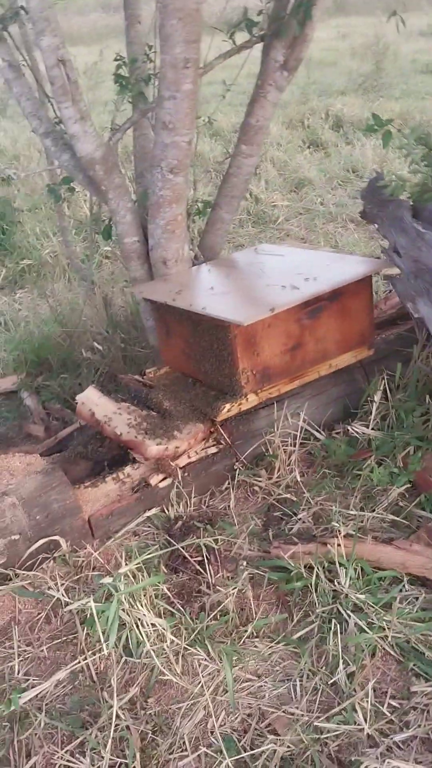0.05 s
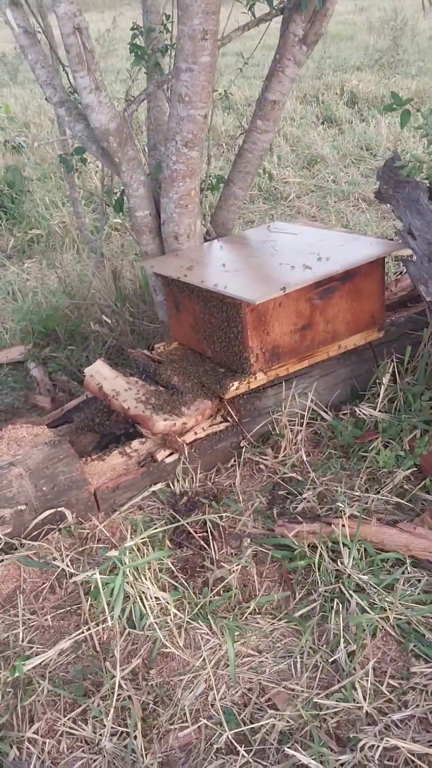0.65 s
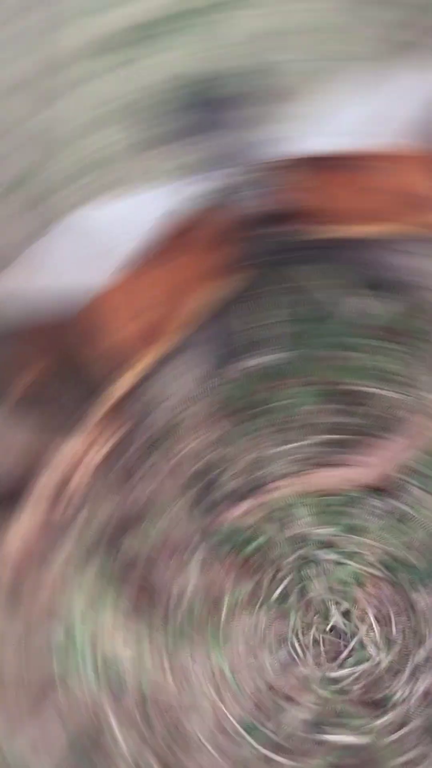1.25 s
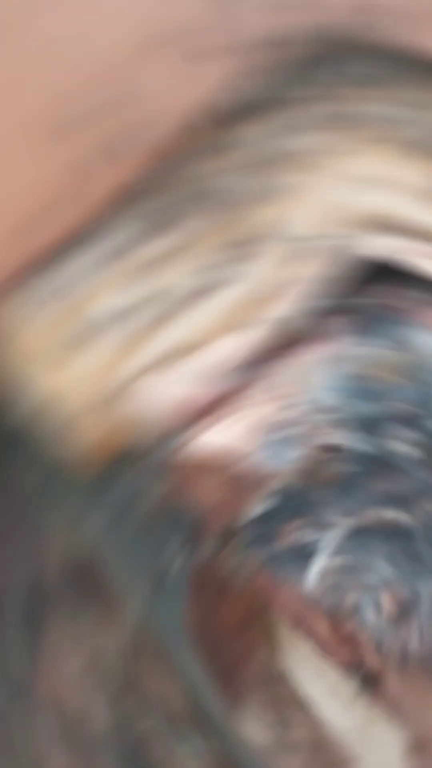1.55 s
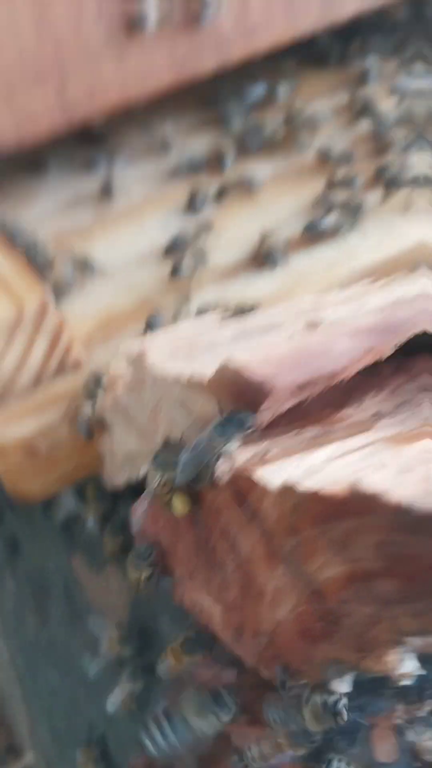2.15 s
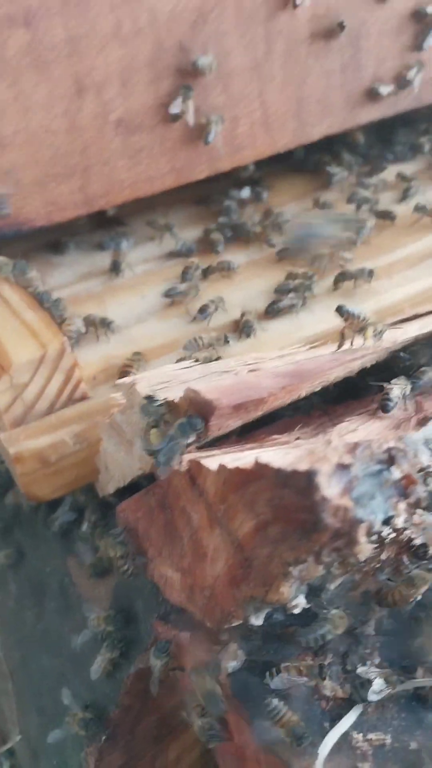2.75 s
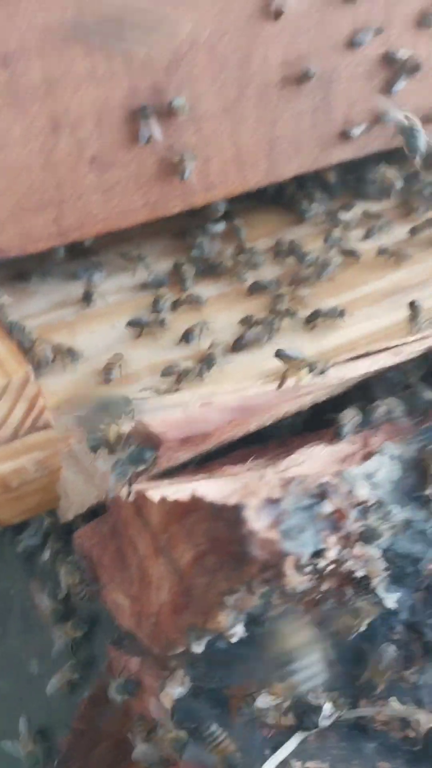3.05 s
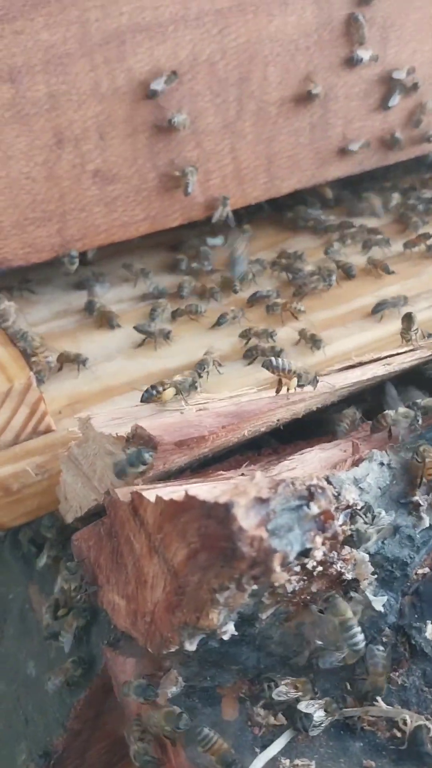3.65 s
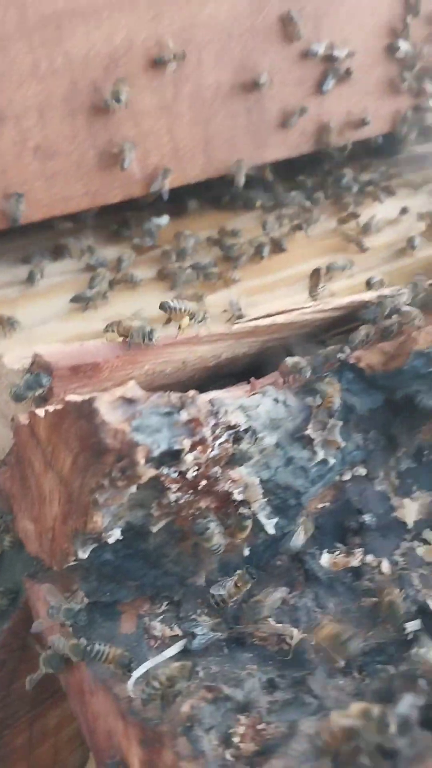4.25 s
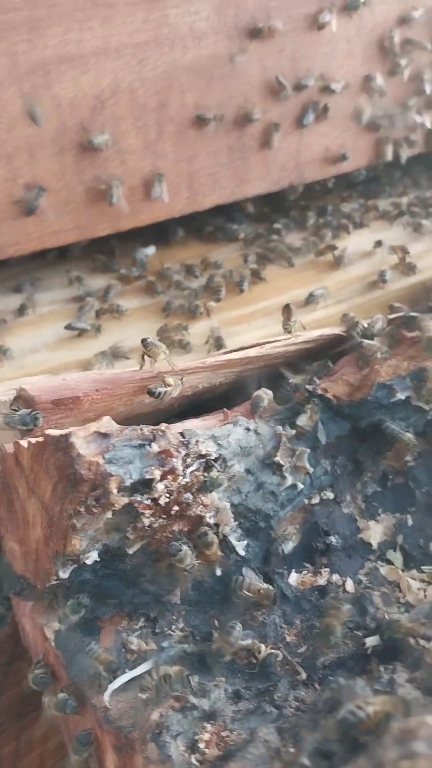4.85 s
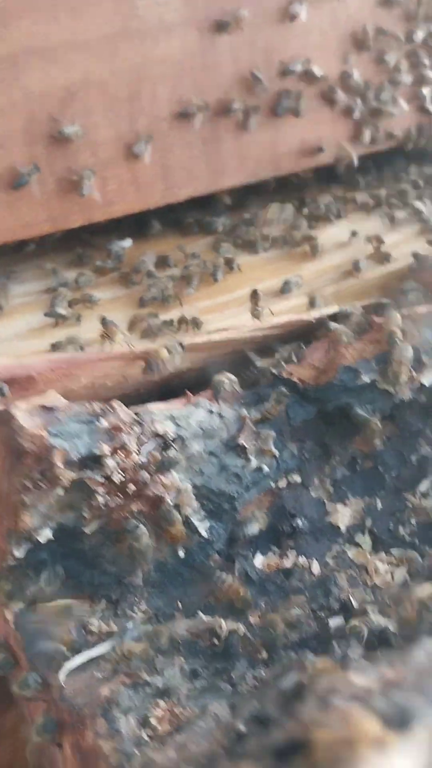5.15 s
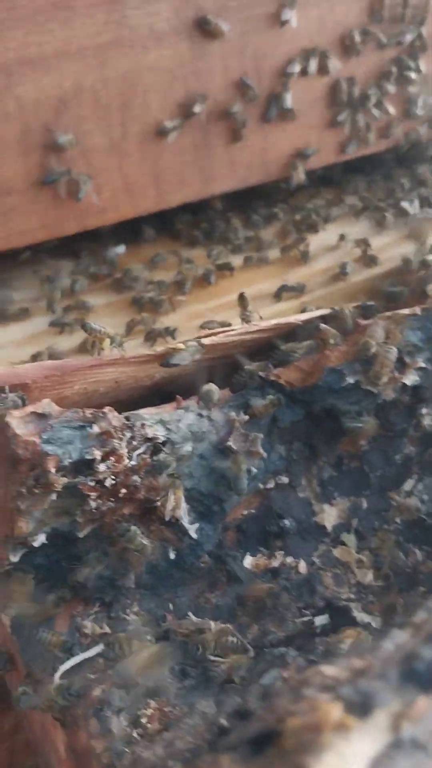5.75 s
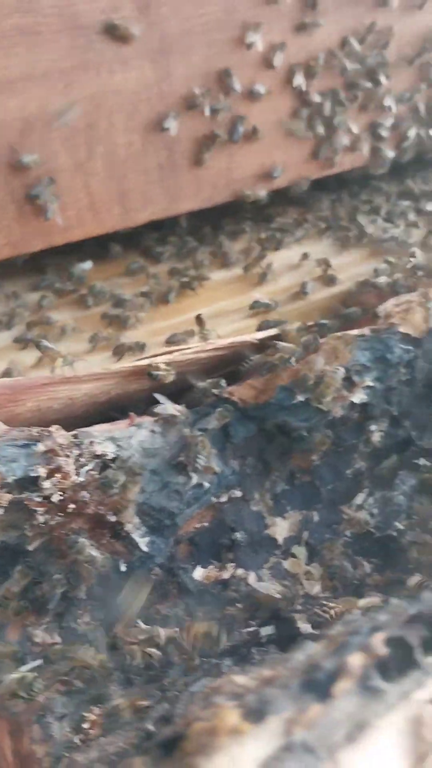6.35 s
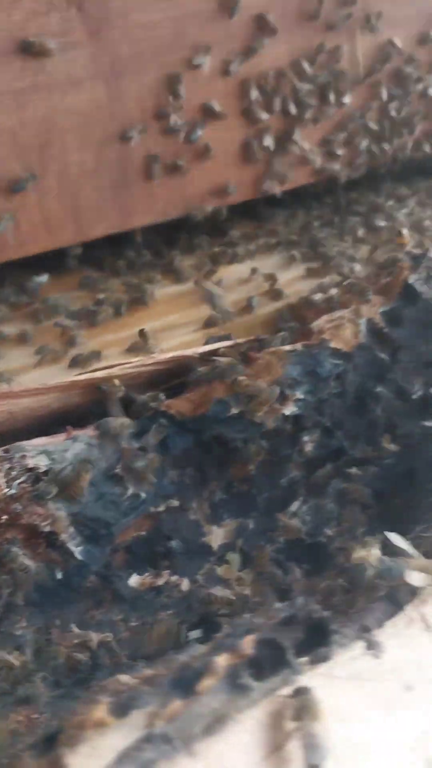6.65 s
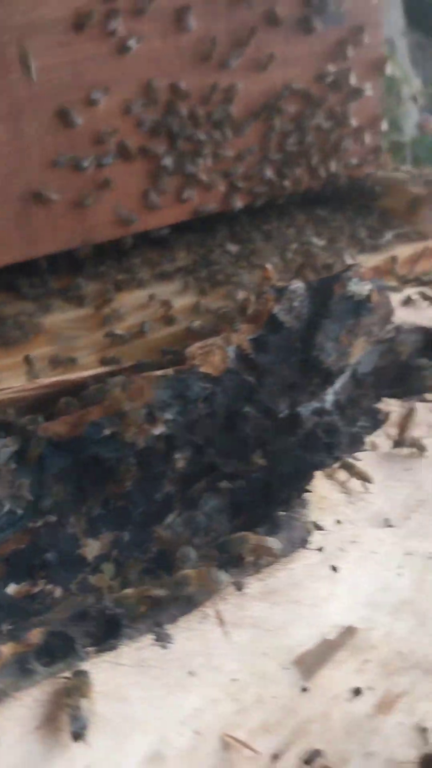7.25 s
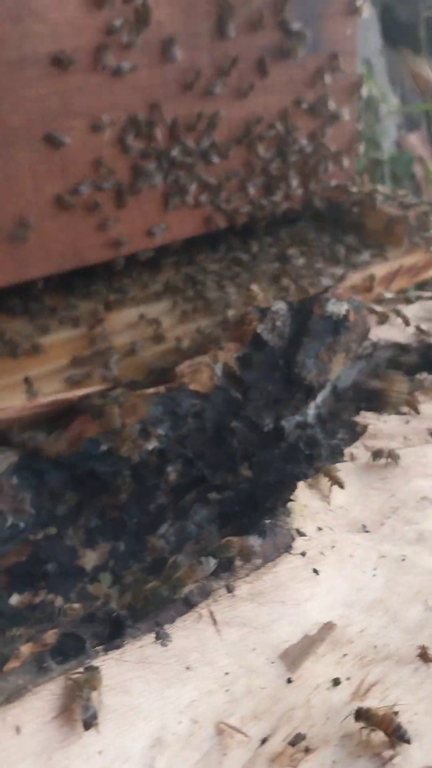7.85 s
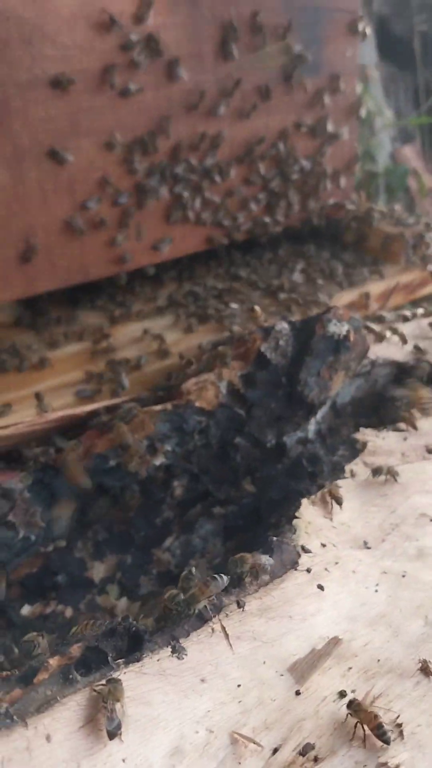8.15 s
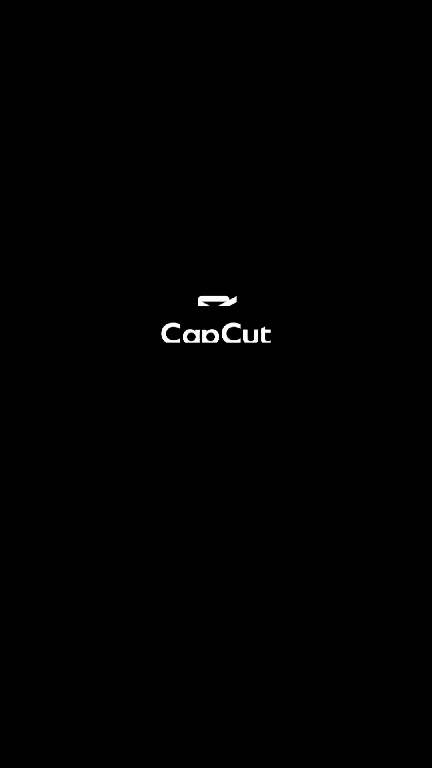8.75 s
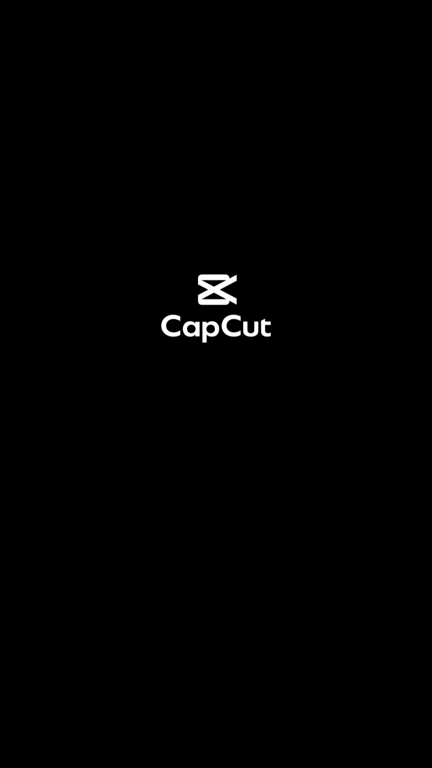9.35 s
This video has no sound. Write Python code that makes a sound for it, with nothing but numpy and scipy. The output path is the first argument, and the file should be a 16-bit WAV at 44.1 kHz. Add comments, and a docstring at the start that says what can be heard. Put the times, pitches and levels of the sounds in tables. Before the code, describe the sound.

For the first 1.5 seconds a honeybee swarm hums faintly from a few metres away outdoors, with a thin insect shrill in the grass. After a split-second gap, the swarm is close and louder at the wooden hive's entrance: a dense, rasping buzz with a fine crawling rustle and dull puffs of air on the microphone. Single bees pass on the left at about 2.7, 4.1 and 4.6 seconds, and on the right at 6.3 and 6.9. Some bump the microphone with soft, low thumps, mostly left, strongest at 4.6 and 6 seconds. Tiny bright ticks come at 2.2 and 6.7. From 4.5 seconds one bee hovers at the left, its drone loudest between 7 and 7.8, while the insect shrill fades. At 7.8 the level drops and the left side loses its bass. Everything cuts off at about 8.5 seconds.

```python
"""A field with a wooden hive box: a honeybee swarm settles, heard from a few metres, then at the entrance.
Dozens of wingbeats merge into a rasping hum. Single bees fly past, one hovers at the left microphone,
some bump it softly or tick against something hard. Insects shrill in the grass, air puffs on the
microphones and the crawling cluster rustles. Near the end the level drops and the left loses its bass."""
import sys
import numpy as np
from scipy import signal
from scipy.fft import rfft, irfft, next_fast_len
from scipy.io import wavfile

SR = 44100
rng = np.random.default_rng(int(sys.argv[2]) if len(sys.argv) > 2 else 0)


def persist_wave(psi):
    """Save psi, clipped to +-1, as 16-bit WAV."""
    counts = np.round(np.clip(psi, -1, 1) * 32767).astype(np.int16)
    wavfile.write(sys.argv[1], SR, np.atleast_2d(counts).T)


N = 414965
TIME = np.arange(N) / SR
FAR_SPAN_S, NEAR_SPAN_S = (-.01, 1.474), (1.528, 8.474)
IS_FAR = TIME < FAR_SPAN_S[1]


def from_db(db):
    return 10 ** (np.asarray(db) / 20)


def unit_rms(x):
    return x / np.sqrt(np.mean(x ** 2) + 1e-20)


def curves(rows):
    """Columns after time_s, interpolated to every sample."""
    time_s, *columns = np.transpose(rows)
    return [np.interp(TIME, time_s, column) for column in columns]


def gate(start_s, end_s, edge_s=.002):
    return np.clip(np.minimum(TIME - start_s, end_s - TIME) / edge_s, 0, 1)


def pan(pan_db):
    """Stereo gains; pan_db is left minus right, the louder side stays at unity."""
    return from_db(np.minimum(0, np.array([[1], [-1]]) * pan_db))


def drift(rate_hz, hop=100):
    """Smooth random wander, unit RMS."""
    pole = np.exp(-2 * np.pi * rate_hz * hop / SR)
    white = rng.standard_normal(N // hop + 1002)
    slow = signal.lfilter([1], [1, -2 * pole, pole * pole], white)[1000:]
    return np.interp(TIME, np.arange(len(slow)) * hop / SR, unit_rms(slow))


def coloured_noise(spectrum):
    """Uncorrelated stereo noise, unit RMS."""
    freq_hz, density_db = np.transpose(spectrum)
    size = next_fast_len(N, True)
    log_hz = np.log(np.fft.rfftfreq(size, 1 / SR) + 1)
    gain = from_db(np.interp(log_hz, np.log(freq_hz), density_db))
    white = rng.standard_normal((2, size))
    return unit_rms(irfft(gain * rfft(white))[:, :N])


def swell_power(rows, falloff):
    """Stereo power of events that rise and fall like a fly-by."""
    return sum((from_db(level_db) * pan(pan_db)) ** 2 / (1 + ((TIME - peak_s) / width_s) ** 2) ** falloff
               for peak_s, width_s, level_db, pan_db in rows)


def wing_cycle(harmonics_db, first=1, size=4096, tail_step_db=1.94):
    """One cycle of wing pressure: random phases, ten fading harmonics past the last given."""
    levels_db = np.r_[harmonics_db, harmonics_db[-1] - tail_step_db * np.arange(1, 11)]
    orders = np.arange(len(levels_db))[:, None] + first
    angle = 2 * np.pi * (orders * np.arange(size) / size + rng.random(orders.shape))
    return np.sqrt(2) * from_db(levels_db) @ np.sin(angle)


def repeat_cycle(cycle, beats):
    return cycle[(beats * len(cycle)).astype(int) % len(cycle)]


# insect shrill: freq_hz, density_db
SHRILL_SPECTRUM = [(3000, -18.5), (3500, -28.5), (3850, -7), (4300, -9), (5000, -6.5), (5450, 0.5),
                   (5800, -0.5), (6050, -5), (6300, -22), (7000, -47.5)]

def grass_insects():
    """A wavering high band of noise that dies away late."""
    level_db = np.interp(TIME, [1.5, 5.5, 7.8], [-55, -53, -67])
    return from_db(level_db + drift(9.6)) * coloured_noise(SHRILL_SPECTRUM)


# moving air, puff rumble: freq_hz, density_db
AIR_SPECTRUM = [(20, -22), (40, -16.5), (65, -1.5), (105, -5.5), (160, 8.5), (300, -3), (1000, -41)]
PUFF_SPECTRUM = [(20, -15), (40, -10), (65, -1), (110, 0.5), (170, -5), (300, -18), (1000, -49)]
# air puffs: peak_s, half_width_s, level_db, pan_db
AIR_PUFFS = [(1.93, 0.09, -42, -17), (2.27, 0.052, -49, 7.5), (3.55, 0.047, -52.5, 1),
             (4.15, 0.044, -39.5, 22.5), (4.58, 0.04, -38, 22), (5.78, .11, -46.5, 14),
             (6.28, 0.038, -36.5, -20), (6.62, 0.035, -41, -5.5), (7.04, .045, -33.5, -13.5),
             (7.22, .05, -29.5, 37), (7.42, 0.043, -33, 32)]

def moving_air(far_db=-67, near_db=-57.5, gust_db=5.1):
    """Air on the microphones: an uneven low wash and dull puffs."""
    level_db = np.where(IS_FAR, far_db, near_db) + gust_db * drift(13)
    wash = from_db(level_db) * coloured_noise(AIR_SPECTRUM)
    puffs = np.sqrt(swell_power(AIR_PUFFS, falloff=1.9)) * coloured_noise(PUFF_SPECTRUM)
    return wash + puffs


# cluster rustle: freq_hz, density_db
RUSTLE_SPECTRUM = [(2000, -13), (5000, -6), (7000, -4.5), (8600, -10.5), (10500, -5.5), (12800, -1),
                   (16000, -2)]
# steady crawling: time_s, level_db, pan_db
CRAWL_LEVELS = [(1.53, -47, 5.5), (4.5, -47, 11), (5.2, -48.5, 7), (6.7, -47.5, 8), (7.4, -49.5, 4.5),
                (8.47, -50, 12)]
# rustle flurries: peak_s, half_width_s, level_db, pan_db
CRAWL_FLURRIES = [(1.54, 0.036, -34, -6), (2.22, 0.1, -39, 4), (6.22, .08, -37.5, 11),
                  (6.75, 0.056, -38, 11.5), (6.88, 0.073, -35, 9.5), (7.05, 0.047, -39, 3),
                  (7.62, 0.036, -43, 14)]

def crawling_cluster(far_db=-60.5, far_pan_db=2, scratch_db=1.3):
    """Feet and wings scratch unevenly on wood and bark, with brief flurries."""
    level_db, pan_db = curves(CRAWL_LEVELS)
    sides = pan(np.where(IS_FAR, far_pan_db, pan_db))
    sides = 2 * sides / np.hypot(*sides)   # constant power, +3 dB
    steady = from_db(np.where(IS_FAR, far_db, level_db)) * sides
    flurry_power = ~IS_FAR * swell_power(CRAWL_FLURRIES, falloff=2.2)
    scratch = unit_rms(from_db(scratch_db * drift(163)))
    return np.sqrt(steady ** 2 + flurry_power) * scratch * coloured_noise(RUSTLE_SPECTRUM)


# hard contacts: start_s, peak_db, centre_hz, pan_db
BEE_TICKS = [(2.183, -21, 12930, 17), (6.736, -21, 14000, 11)]

def bee_ticks(decay_s=.0018, size=1024):
    """Bees strike something hard: milliseconds of bright crackle."""
    out, age_s = np.zeros((2, N)), np.arange(size) / SR
    for start_s, peak_db, centre_hz, pan_db in BEE_TICKS:
        burst = rng.standard_normal(size) * np.exp(-age_s / decay_s)
        tick = signal.lfilter(*signal.iirpeak(centre_hz, Q=4, fs=SR), burst)
        start = int(start_s * SR)
        out[:, start:start + size] += from_db(peak_db) * pan(pan_db) * tick / np.abs(tick).max()
    return out


# soft contacts: time_s, peak_db, pitch_hz, pan_db
BEE_BUMPS = [(1.317, -36, 90, -28), (1.344, -39, 90, -23), (2.728, -19.5, 95, 30), (2.787, -20.5, 105, 30),
             (4.136, -20.5, 124, 34), (4.148, -18, 108, 30), (4.584, -3, 153, 38), (4.601, -19, 100, 29),
             (4.618, -23, 100, 24), (5.951, -10, 162, 32), (5.969, -19.5, 109.5, 33),
             (6.237, -27, 100, -28.5), (6.272, -39, 110, -23.5), (6.298, -22, 109, -26),
             (7.222, -20, 120, 32.5), (7.417, -23.5, 115, 30), (8.38, -38, 79.96, -25)]

def bee_bumps(rise_cycles=.51, size=4096):
    """Bees brush the microphones: a soft push of air, gone in about two cycles."""
    out, age_s = np.zeros((2, N)), np.arange(size) / SR
    for time_s, peak_db, pitch_hz, pan_db in BEE_BUMPS:
        rise = age_s * pitch_hz / rise_cycles
        push = rise ** 2 * np.exp(-2 * rise) * np.sin(2 * np.pi * pitch_hz * age_s)
        start = int((time_s - .25 / pitch_hz) * SR)
        out[:, start:start + size] += from_db(peak_db) * pan(pan_db) * push / np.abs(push).max()
    return out


# entrance peaks and dip: centre_hz, q, gain_db
ENTRANCE_BANDS = [(333, 10, -2), (434, 4.2, 4), (684, 18, 5.5)]

def entrance_colour(hum):
    """The air between box, log and ground colours the hum."""
    for centre_hz, q, gain_db in ENTRANCE_BANDS:
        band = signal.lfilter(*signal.iirpeak(centre_hz, q, fs=SR), hum)
        hum = hum + (from_db(gain_db) - 1) * band
    return hum


# swarm bee wingbeat, harmonic 1 up: level_db
SWARM_HARMONICS_DB = [1, -1.5, -14, -12, -11.5, -17.5, -21, -25, -24.5, -28, -30, -29]

def swarm_wings(far_hz=256, near_hz=244, spread=.081, skew=.14, wander=.045, count=40):
    """Hum and stroke pulses of many bees, each with its own pitch, swell and side."""
    swell_db, width_db = 4, 7
    centre_hz = np.where(IS_FAR, far_hz, near_hz)
    stroke = np.hanning(256) ** 4
    stroke -= stroke.mean()
    hum, strokes = np.zeros((2, N)), np.zeros((2, N))
    ranks = np.arctanh(np.linspace(-1, 1, count + 2)[1:-1])
    for bee, rank in enumerate(ranks):
        detune = spread * (rank - skew * rank ** 2)   # most near the centre, a few fan much slower
        beats = np.cumsum(centre_hz * (1 + detune + wander * drift(2.4))) / SR
        swell = from_db(swell_db * drift(2.54))
        left, right = pan(width_db * (-1) ** bee)[:, 0]
        cycle = wing_cycle(SWARM_HARMONICS_DB)
        hum[0] += left * swell * repeat_cycle(cycle, beats)
        hum[1] += right * swell * repeat_cycle(cycle, beats + rng.random())   # phase varies by direction
        strokes[bee % 2] += swell * repeat_cycle(stroke, beats)
    return unit_rms(hum), unit_rms(strokes)


# wing rasp: freq_hz, density_db
RASP_SPECTRUM = [(150, -12), (330, 9.5), (600, 8.5), (1200, -0.5), (1800, -2), (2600, -4.5), (4000, -5),
                 (5600, -8.5), (7200, -14.5), (8600, -22.5), (12000, -13), (16000, -20.5)]
# swarm at the entrance, before colouring: time_s, hum_db, rasp_db
SWARM_LEVELS = [(1.53, -31, -41), (2, -31.2, -37), (2.6, -30, -39.5), (3.9, -30.7, -39), (4.8, -32, -42.5),
                (5.6, -31, -41.5), (6.1, -30.5, -39), (6.85, -29.5, -39.5), (7.25, -34, -42),
                (8.47, -33.5, -45.5)]

def swarm(far_hum_db=-44.5, far_rasp_db=-56.5, rasp_depth=.22):
    """Bees in flight: merged hum plus rasp pulsed by the wing strokes."""
    hum_db, rasp_db = curves(SWARM_LEVELS)
    hum, strokes = swarm_wings()
    hum = np.where(IS_FAR, from_db(far_hum_db) * hum, from_db(hum_db) * entrance_colour(hum))
    rasp = coloured_noise(RASP_SPECTRUM) * (1 + rasp_depth * strokes)
    return hum + from_db(np.where(IS_FAR, far_rasp_db, rasp_db)) * rasp


# close bee wingbeat, harmonic 2 up: level_db
CLOSE_OVERTONES_DB = [0.1, -8.5, -10.5, -18.5, -23, -31, -31.5, -29.5, -35.5, -33.5, -47.5, -43.5, -46.5,
                      -47.5, -48]

def close_bee(pitch_hz, fundamental_db, overtones_db, rasp_db, rasp, flutter, shimmer_db, jitter=.00398):
    """Pumped air gives the fundamental; overtones shift as the bee turns; each stroke rasps."""
    unrest = np.clip(from_db(-.5 * (overtones_db + 24)), 1, 2.5)   # steadiest when close
    beats = np.cumsum(pitch_hz * (1 + flutter * unrest * drift(10) + jitter * drift(59.9))) / SR
    gain = from_db(fundamental_db + shimmer_db * unrest * drift(21.05))
    fundamental = gain * np.sqrt(2) * np.sin(2 * np.pi * beats)
    heading_rad = .32 * drift(7)
    front, flank = (repeat_cycle(wing_cycle(CLOSE_OVERTONES_DB, first=2), beats) for _ in range(2))
    overtones = np.cos(heading_rad) * front + np.sin(heading_rad) * flank
    stroke_rasp = rasp * np.sin(np.pi * beats) ** 4
    return fundamental + from_db(overtones_db) * overtones + from_db(rasp_db) * stroke_rasp


def distance_db(closest_s, half_width_s):
    """Distance on a straight path, relative to closest approach."""
    return 10 * np.log10(1 + ((TIME - closest_s) / half_width_s) ** 2)


# fly-bys: closest_s, half_width_s, pitch_hz, far_shift_hz, fundamental_db, overtones_db, rasp_db, pan_db
FLY_BYS = [(2.685, .04, 287.7, -19.5, -27, -38, -43, 23.5), (4.13, .07, 222.4, 17, -15.5, -28, -36.5, 30.5),
           (4.554, .08, 262.6, -6, -27, -33.5, -41, 32), (6.28, .09, 252.1, 13, -27, -33.5, -30.5, -23),
           (6.905, .06, 236.8, 16, -15, -26.5, -31.5, -28.5)]

def passing_bees(rasp, air, draught_db=-29, rasp_cut_hz=750, wake_lag_s=.027):
    """Each bee shifts its beat as it nears; overtones peak just behind it, rasp carries furthest."""
    fundamental_falloff, overtone_falloff, rasp_falloff = 2.23, 2.07, 1.4   # powers of distance
    out = np.zeros((2, N))
    rasp = signal.sosfilt(signal.butter(2, rasp_cut_hz, "high", fs=SR, output="sos"), rasp)
    for closest_s, width_s, pitch_hz, shift_hz, level_db, overtones_db, rasp_db, pan_db in FLY_BYS:
        away_db = distance_db(closest_s, width_s)
        level_db -= fundamental_falloff * away_db
        overtones_db -= overtone_falloff * distance_db(closest_s + wake_lag_s, width_s)
        rasp_db -= rasp_falloff * away_db
        pitch_hz += shift_hz * (1 - from_db(-away_db))
        bee = close_bee(pitch_hz, level_db, overtones_db, rasp_db, rasp, flutter=.005, shimmer_db=1.5)
        draught = from_db(level_db + draught_db) * air
        out += pan(pan_db) * (bee + draught)
    return out


# hover wingbeat: time_s, pitch_hz
HOVER_PITCH = [(4.5, 210.2), (4.82, 208), (5.34, 220.5), (5.62, 212.8), (5.74, 222.6), (5.94, 207.4),
               (6.38, 204.9), (6.54, 214.1), (6.66, 209.2), (7.3, 211), (7.38, 202.7), (7.86, 205),
               (8.02, 201.9), (8.42, 203.2)]
# hover fundamental: time_s, level_db
HOVER_LEVELS = [(4.3, -39), (4.55, -33.5), (5.2, -31), (5.68, -31), (5.95, -27.5), (6.35, -25), (6.5, -30),
                (6.82, -21.5), (7.3, -18.5), (7.78, -19), (7.92, -25), (8.47, -27.5)]

def hovering_bee(rasp, air, closest_db=-18.5, closest_overtones_db=-22.5, draught_db=-30, pan_db=30):
    """One bee hangs by the left microphone: louder, brighter and draughtier as it nears."""
    pitch_hz, = curves(HOVER_PITCH)
    level_db, = curves(HOVER_LEVELS)
    overtones_db = closest_overtones_db + 1.104 * (level_db - closest_db)
    rasp_db = overtones_db - 24
    bee = close_bee(pitch_hz, level_db, overtones_db, rasp_db, rasp, flutter=.003, shimmer_db=1.64)
    draught = from_db(level_db + draught_db) * air
    return pan(pan_db) * (bee + draught) * (TIME > HOVER_LEVELS[0][0])


def scene():
    """Swarm, single bees and the field around them."""
    bed = swarm() + moving_air()
    rasp, air = coloured_noise(RASP_SPECTRUM), coloured_noise(AIR_SPECTRUM)
    single_bees = hovering_bee(rasp[0], air[0]) + passing_bees(rasp[1], air[1])
    return bed + single_bees + grass_insects() + crawling_cluster() + bee_bumps() + bee_ticks()


def record(dry, drop_s=7.806, left_db=-5.5, right_db=-2.5, bass_cut_hz=335, top_cut_hz=15900):
    """Late level drop with left bass cut; silence outside the two spans; top cut throughout."""
    thin_left = signal.sosfilt(signal.butter(6, bass_cut_hz, "high", fs=SR, output="sos"), dry[0])
    dropped = np.array([from_db(left_db) * thin_left, from_db(right_db) * dry[1]])
    out = dry + gate(drop_s, TIME[-1]) * (dropped - dry)
    out *= gate(*FAR_SPAN_S) + gate(*NEAR_SPAN_S)
    return signal.sosfilt(signal.ellip(10, .2, 80, top_cut_hz, fs=SR, output="sos"), out)


dry = scene()
out = record(dry)
persist_wave(out)
```